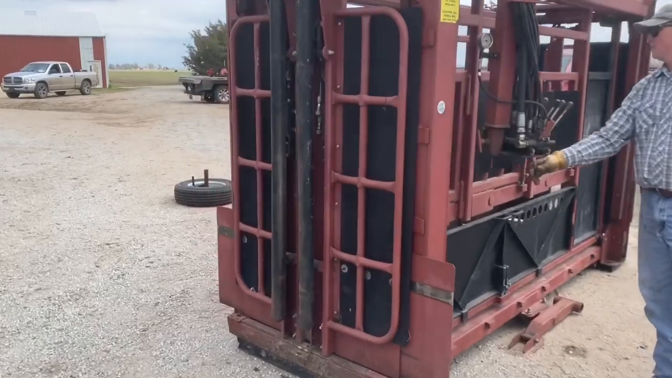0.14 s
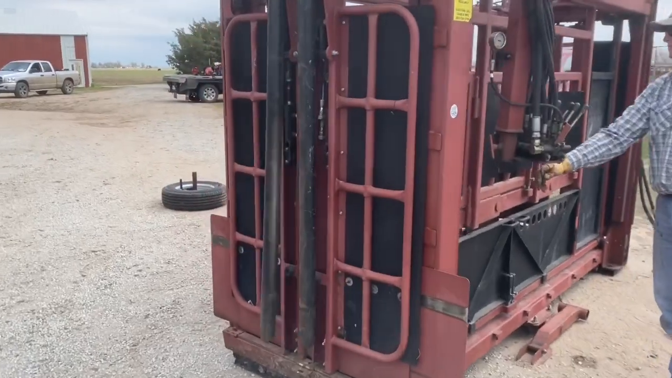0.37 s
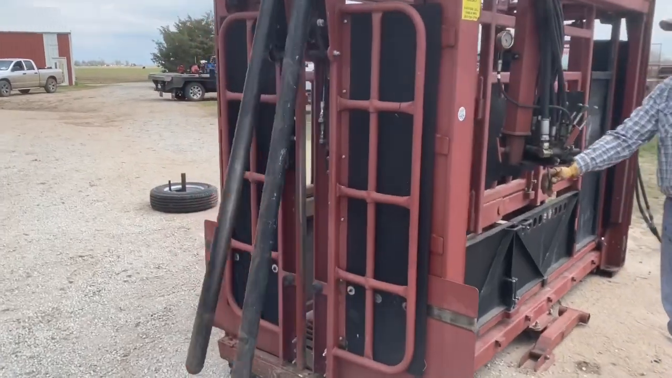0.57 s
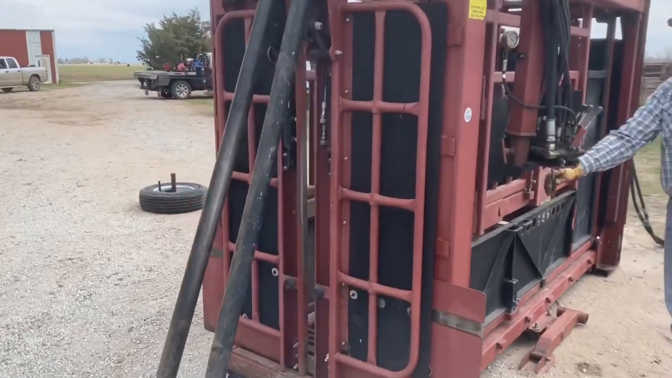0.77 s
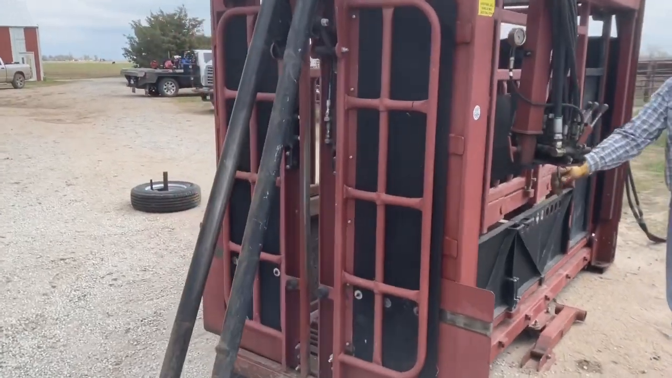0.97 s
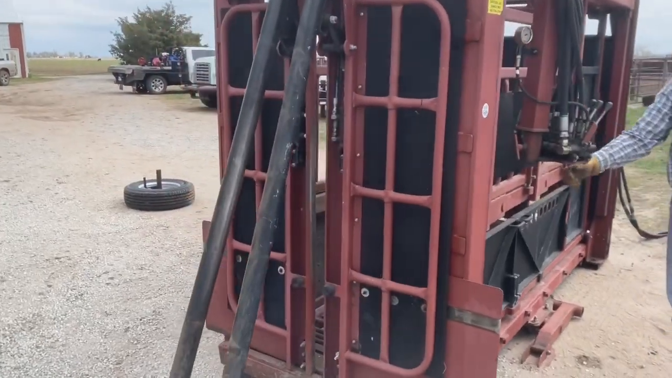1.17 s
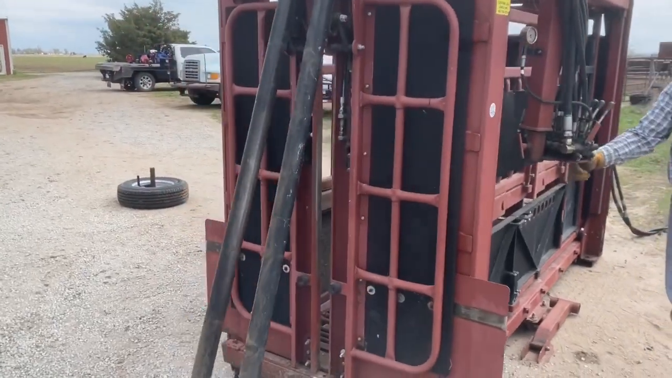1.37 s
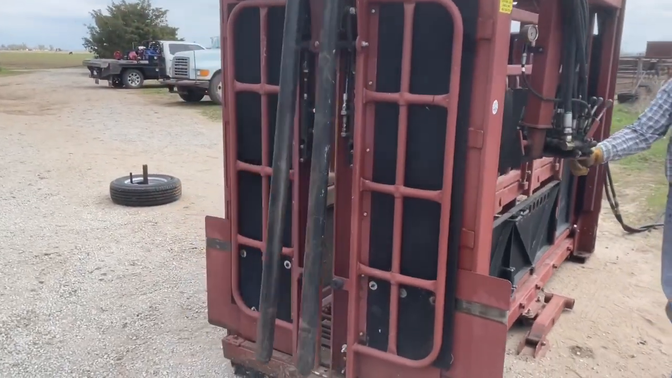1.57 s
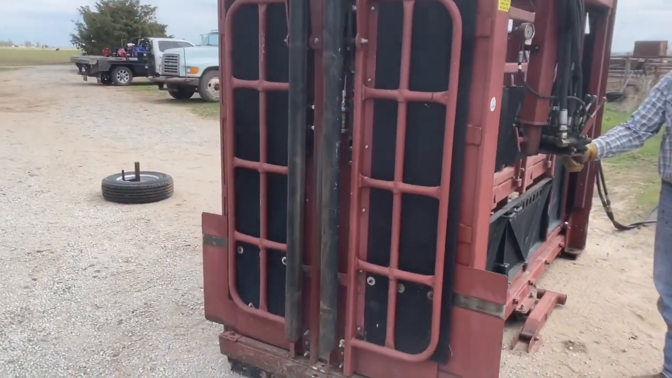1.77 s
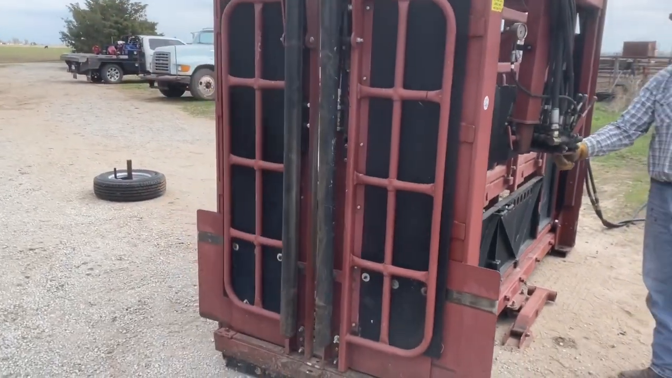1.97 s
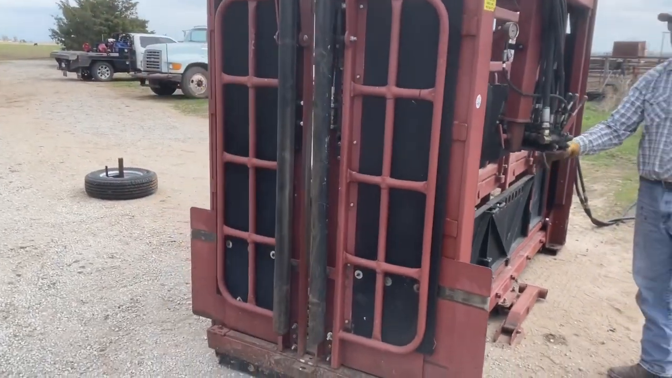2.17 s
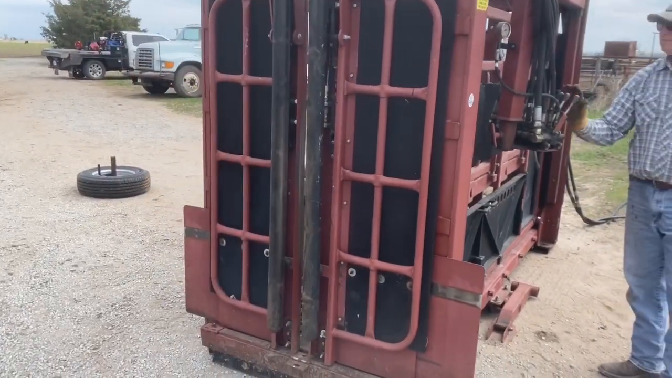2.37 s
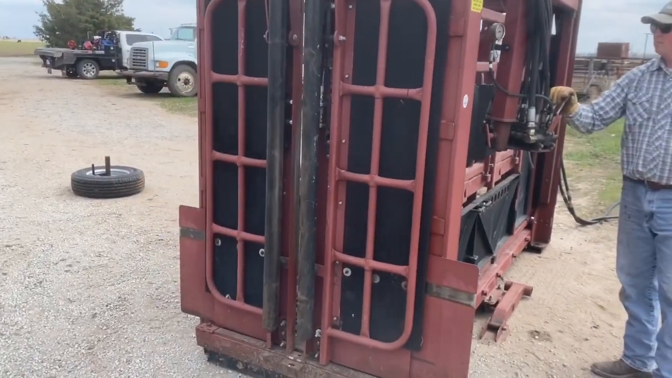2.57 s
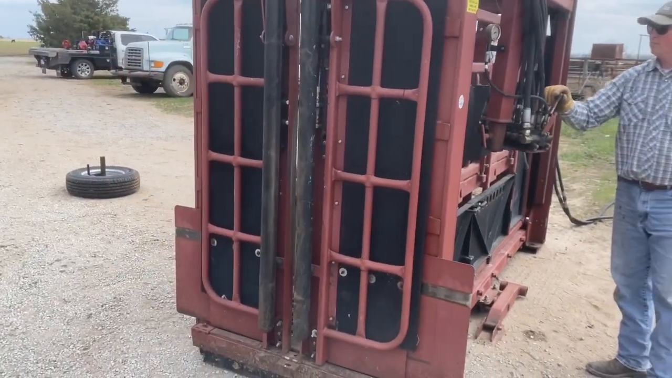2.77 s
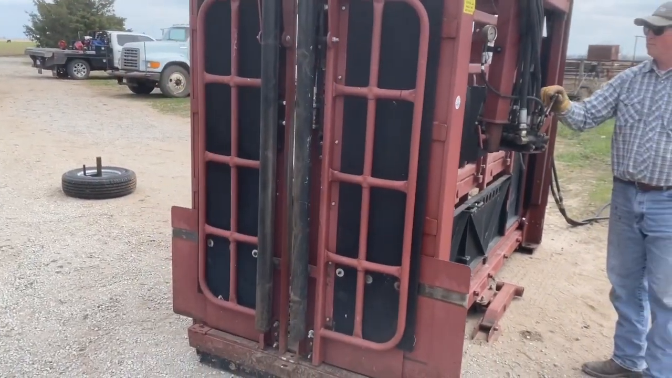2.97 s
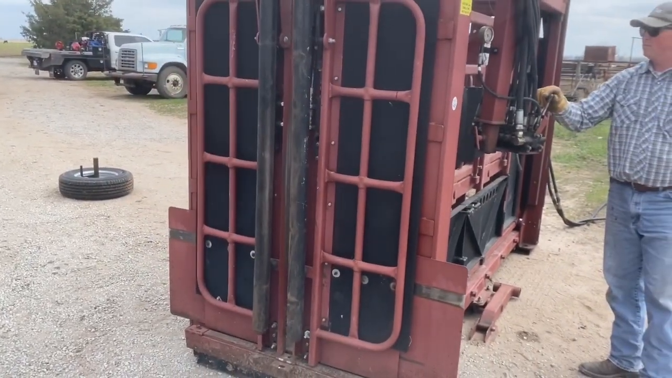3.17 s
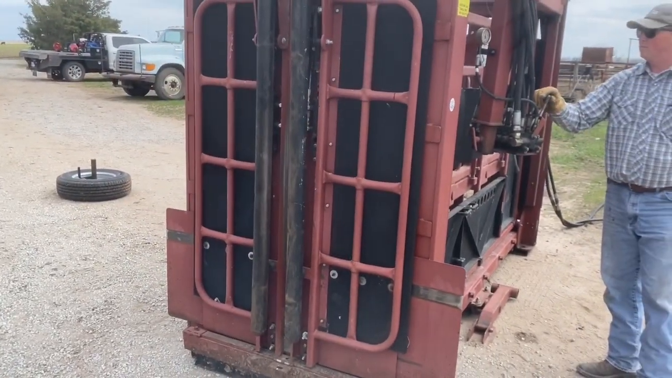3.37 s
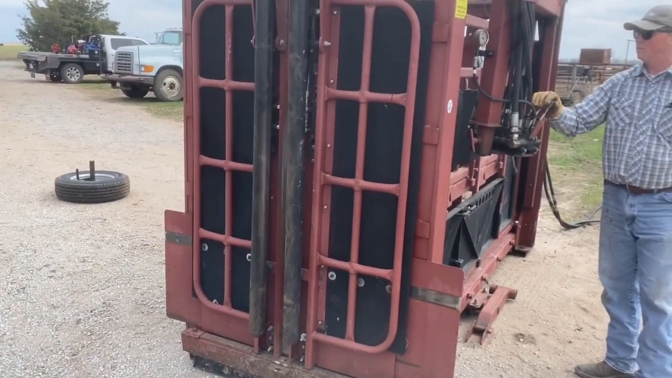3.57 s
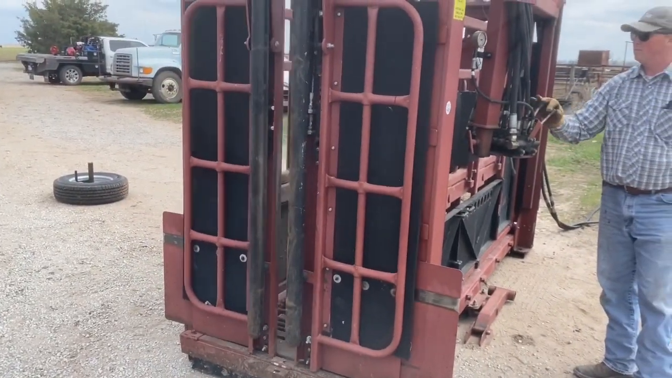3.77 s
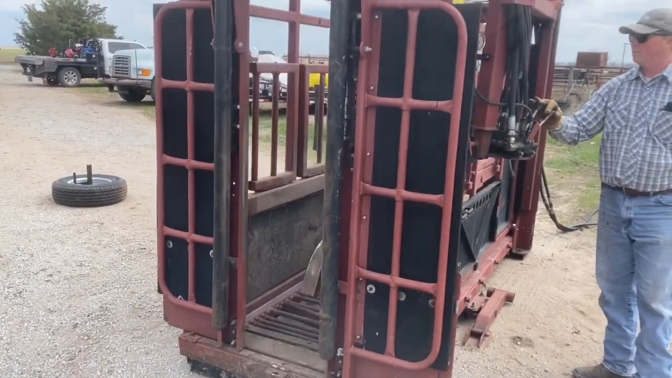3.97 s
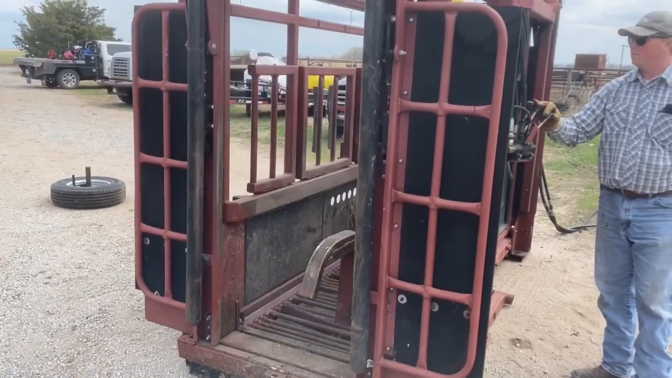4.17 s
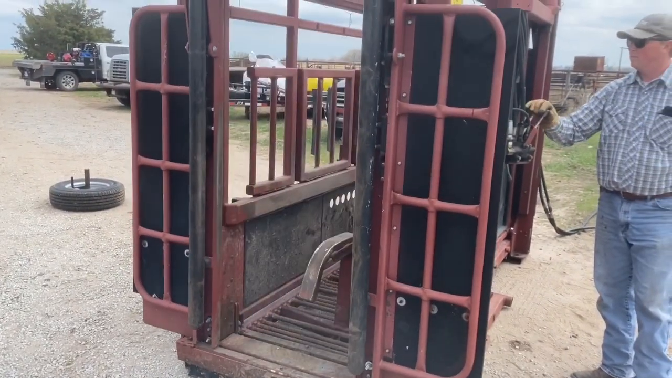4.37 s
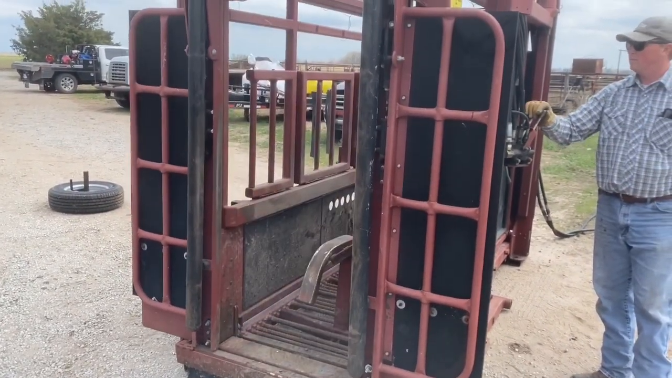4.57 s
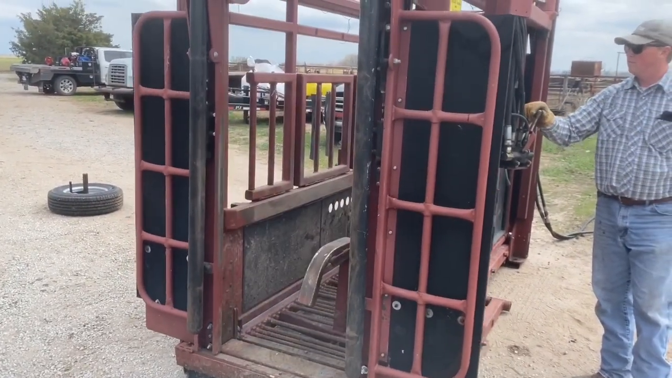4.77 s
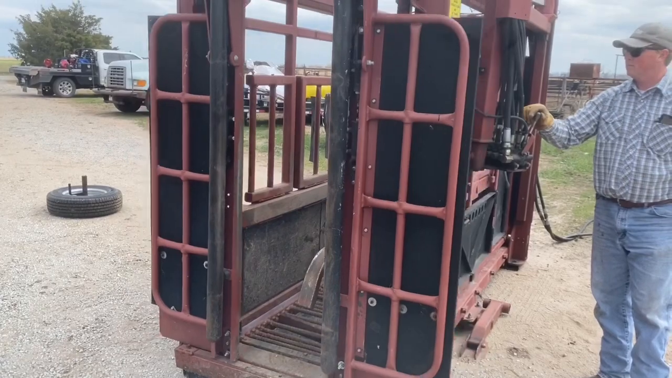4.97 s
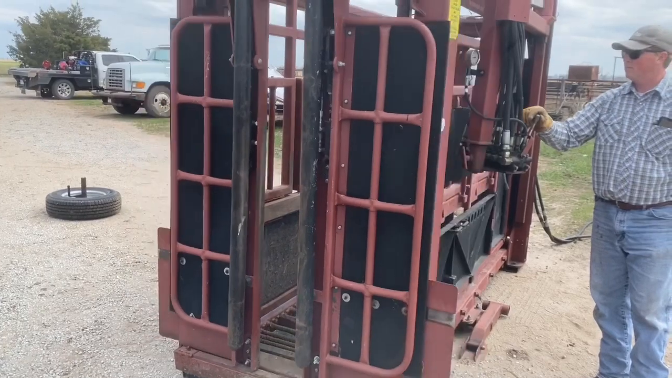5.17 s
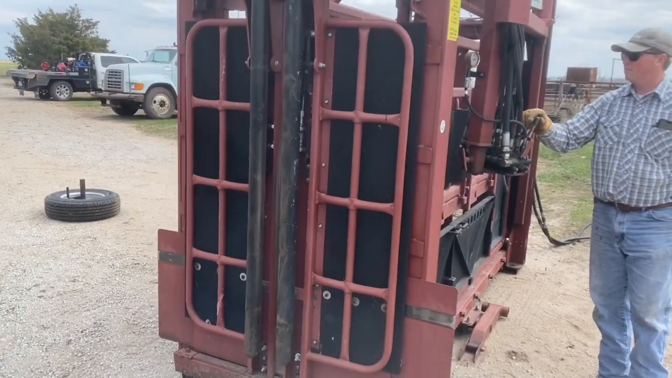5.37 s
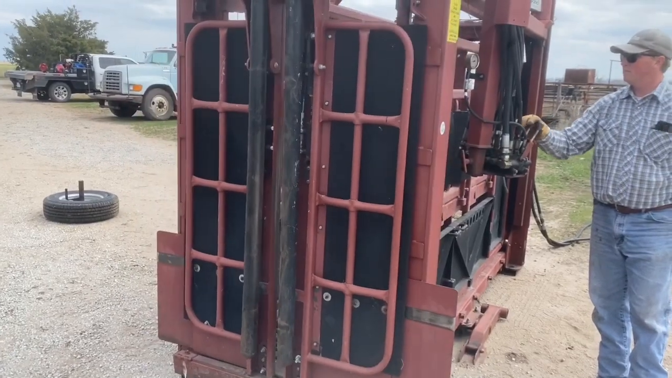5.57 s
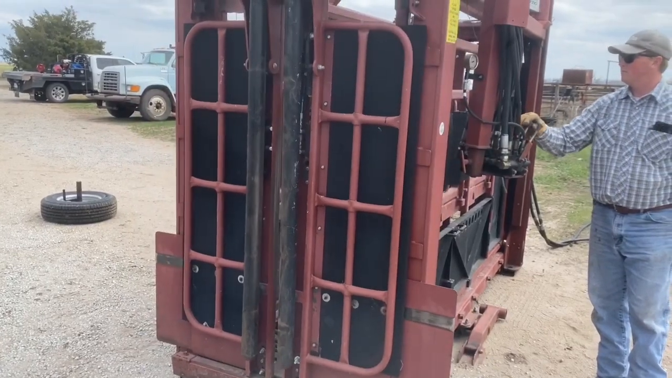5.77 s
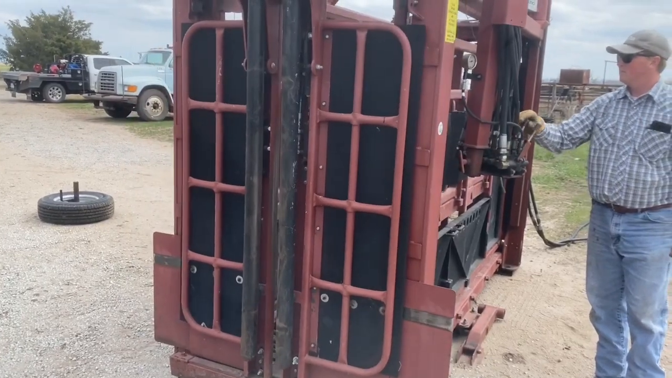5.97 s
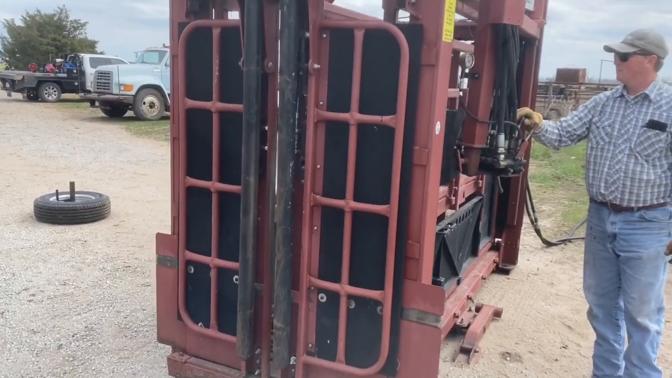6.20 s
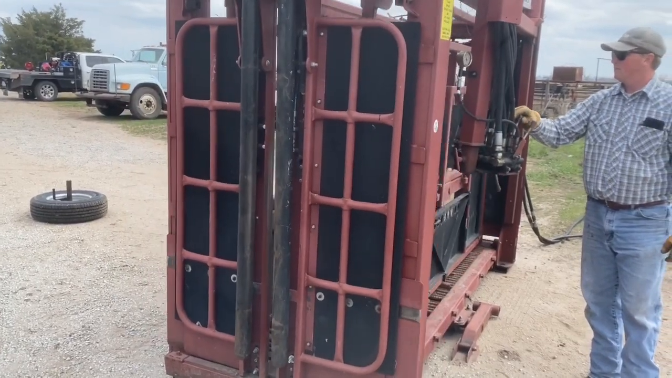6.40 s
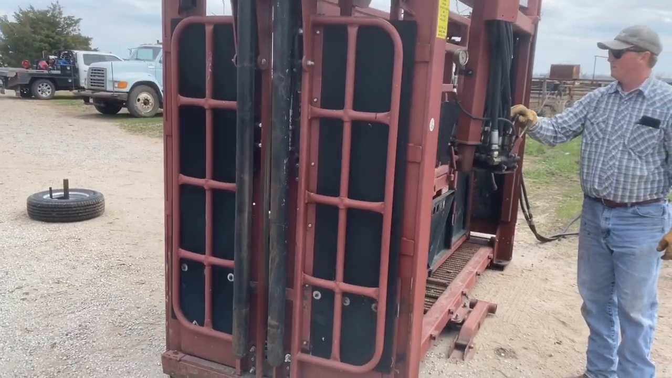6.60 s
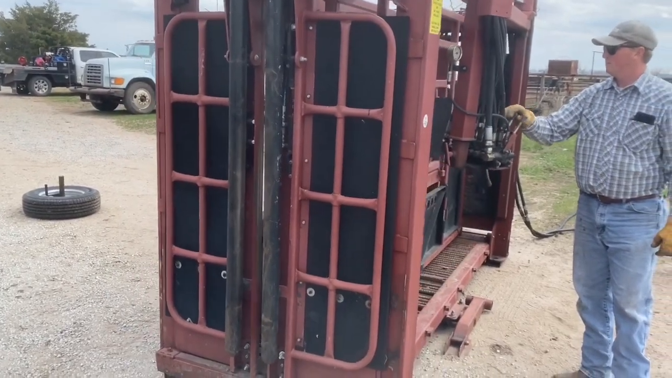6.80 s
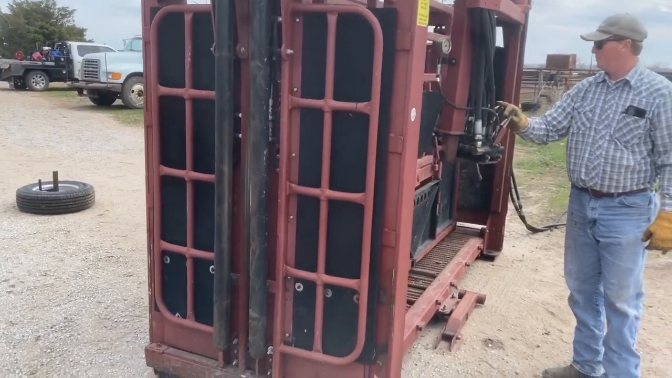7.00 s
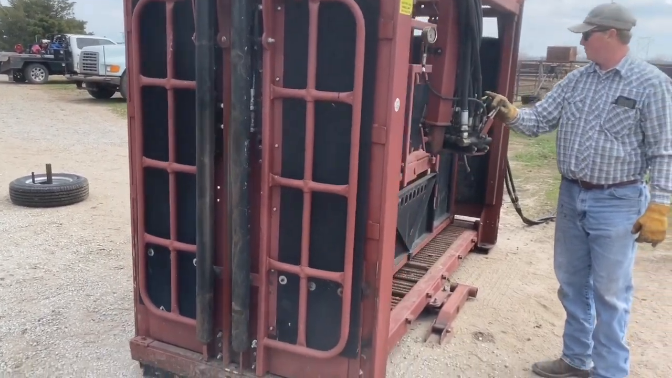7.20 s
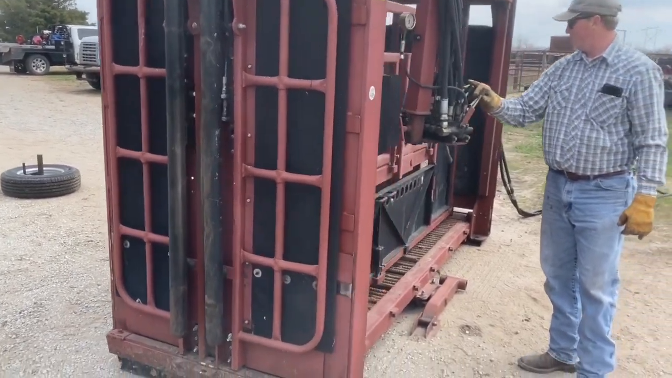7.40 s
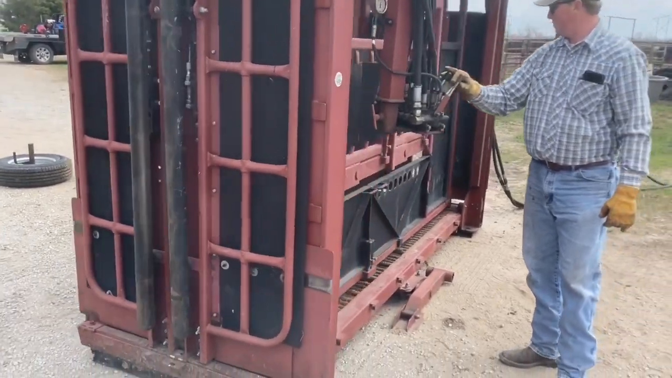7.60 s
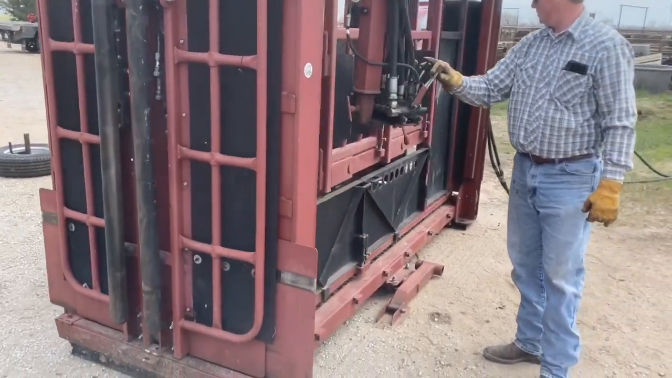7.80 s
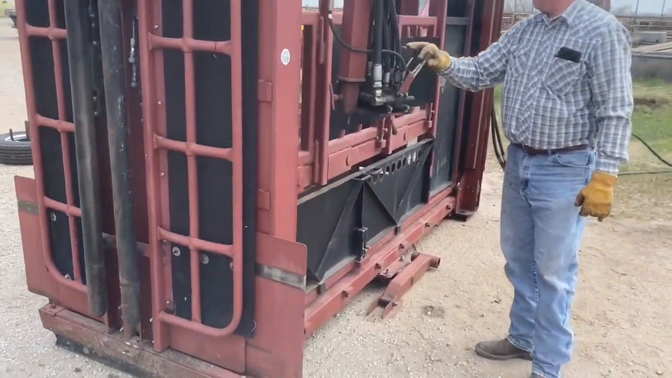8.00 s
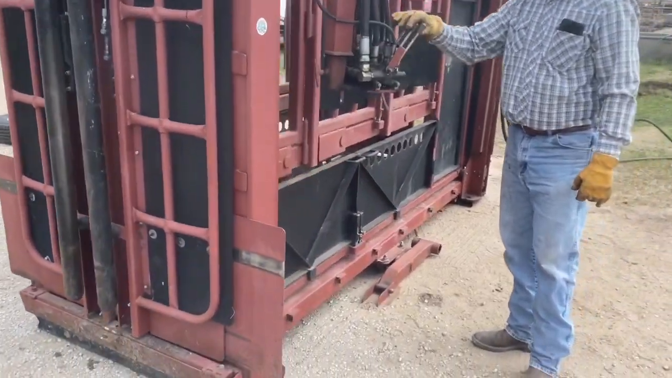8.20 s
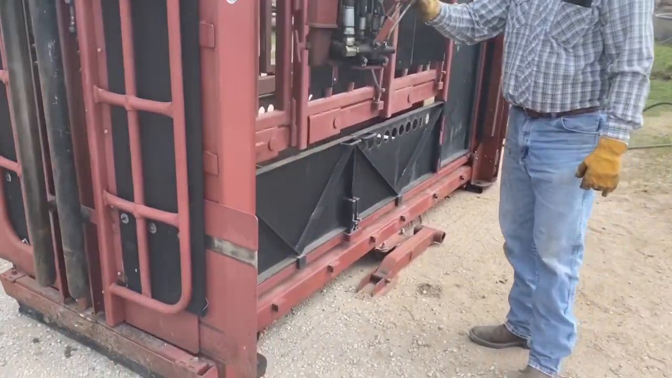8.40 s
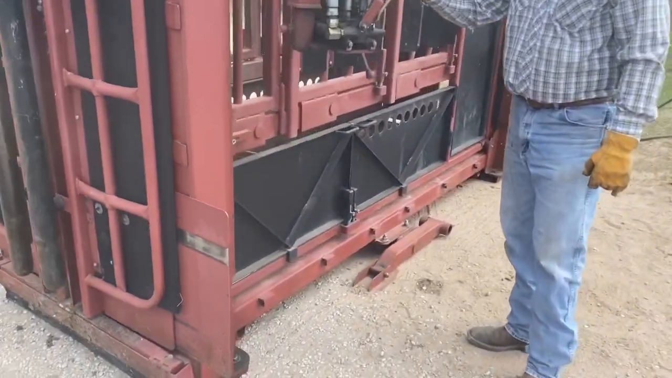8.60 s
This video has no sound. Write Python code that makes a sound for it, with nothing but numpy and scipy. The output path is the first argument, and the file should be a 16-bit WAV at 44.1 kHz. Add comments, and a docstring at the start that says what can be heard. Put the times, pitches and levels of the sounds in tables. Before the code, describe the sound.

Outdoors in a quiet yard, a hydraulic cattle chute is worked close to the microphone. Valve oil hisses over a faint pump hum; steel gates grind, squeal briefly and slam twice with deep booms. After a near-quiet pause they bang and rattle again, then slam. Finally the side panels scrape and clink lightly, with low wind rumble on the microphone.

```python
"""Steel head gates of an empty hydraulic cattle chute grind along a track, squeal and slam into their stops.
Friction and blows are bursts of noise played through modelled steel; later the side panels scrape and clink.
Oil hisses through the lever valves as shaped noise, and the pump motor hums throughout as a few wavering tones.
Quiet yard air is a bed of coloured noise; near the end, low bursts of noise make wind on the microphone."""
import sys
import numpy as np
from scipy import signal
from scipy.fft import rfft, irfft
from scipy.io import wavfile
from scipy.ndimage import uniform_filter1d

SR = 44100
rng = np.random.default_rng(int(sys.argv[2]) if len(sys.argv) > 2 else 0)


def wav_record(signal):
    """Record a signal, one row per channel, as 16-bit PCM in the file named by sys.argv[1]."""
    frames = np.transpose(np.atleast_2d(signal))
    bounded = np.clip(frames, -1, 1)
    # unit amplitude maps onto the largest positive 16-bit level
    quanta = np.round(bounded * 32767).astype(np.int16)
    wavfile.write(sys.argv[1], SR, quanta)


N = 381460
TIME = np.arange(N) / SR   # seconds

# Levels in the tables are starting levels; the functions then mix and shape them.
# long rings of the frame: pitch_hz, level_db, t60_s (time to fade by 60 dB)
FRAME_MODES = [(252, 0.5, 0.86), (358.6, -4, 0.55), (548, -20, 2), (590, -20, 1.86), (657, -17, 1.2),
               (690, -21, 2.1), (780, -10, 0.6), (923, -9, 0.45), (1140, -5.5, 0.43), (1233, 1, 0.26),
               (1520, -3, 0.32), (1840, -11, .48), (1940, -39, 1.8), (2630, -20, 0.49), (3100, -29, 0.38),
               (3600, -20, .4), (3890, -22, 0.27), (4580, -30, .7), (4664, -22, 0.69), (5400, -19, 0.18),
               (5670, -28, .22), (6200, -23.5, .25)]
# tone colour of the latch: frequency_hz, level_db
LATCH_COLOUR = [(150, -23), (350, -3), (1240, 2.5), (1940, -0.5), (2900, -9), (5000, -12.5), (7500, -23),
                (10000, -26.5), (15500, -39)]
# stereo width of the steel: frequency_hz, side_minus_mid_db
STEEL_WIDTH = [(60, -38.5), (350, -23), (700, -15.5), (1300, -10.5), (2400, -5.5), (4400, 2.5),
               (6500, -4.5), (9000, -11)]
# stereo width of the oil hiss and yard air: frequency_hz, side_minus_mid_db
OIL_WIDTH = [(60, -6), (300, -12), (1300, -1.5), (2400, -5.5), (4400, -2), (6500, -1), (9000, -14)]
# hum of the pump motor: pitch_hz, level_db
HUM = [(120, -49.5), (240, -64), (358, -61.5), (592, -71)]
# a lever is pulled and oil runs through its valve: opens_s, closes_s, hiss_db, whistle_hz
PULLS = [(-.1, 0.031, -47, 9830), (0.21, 0.224, -60, 9530), (0.275, 0.943, -47, 9470),
         (1.24, 1.257, -62, 9500), (1.327, 1.74, -47, 9400), (1.74, 1.86, -55, 9400),
         (1.87, 2.062, -47.5, 9470), (2.971, 3.09, -51, 8850), (3.087, 3.486, -48.5, 8750),
         (3.632, 3.66, -61, 9000), (3.72, 4.1, -61, 9260), (4.107, 4.282, -48.5, 9200),
         (4.63, 4.653, -59, 9170), (4.823, 5.36, -58, 9500), (6.028, 6.602, -57, 9330),
         (6.946, 7.03, -56, 9250), (7.044, 8.01, -47, 9340)]

# loose parts rattle while steel moves: knocks per second, level over that of the motion (dB)
GATE_RATTLES_PER_S, GATE_RATTLE_DB = 8, 2
PANEL_RATTLES_PER_S, PANEL_RATTLE_DB = 13, -10
RATTLE_CRACK_DB = -3.5   # relative to the clang of the same rattle


def amp(db):
    """Turn decibels into a plain multiplier."""
    return 10 ** (np.asarray(db) / 20)


def rms_one(x):
    """Scale a signal to an rms level of 1."""
    return x / np.sqrt(np.mean(x ** 2) + 1e-20)


def level(rows, axis=1):
    """Gain over time from a dB column; practically silent outside the table."""
    rows = np.array(rows)
    return amp(np.interp(TIME, rows[:, 0], rows[:, axis], left=-120, right=-120))


def at_hz(points, hz):
    """Read a table on a log-frequency axis."""
    points = np.array(points)
    return np.interp(np.log(hz + 1), np.log(points[:, 0]), points[:, 1])


def drift(rate):
    """Random wandering with rms 1, joining a given number of random points per second."""
    knots = rng.standard_normal(int(N / SR * rate) + 2)
    return rms_one(np.interp(TIME * rate, np.arange(len(knots)), knots))


def cut(x, hz, kind, order=2):
    """Butterworth filter: keeps the low, high or band part of a signal."""
    edges = np.clip(hz, 10, .45 * SR)
    return signal.sosfilt(signal.butter(order, edges, kind, fs=SR, output="sos"), x)


def stereo_noise(colour, width, lo_hz, hi_hz, size=N):
    """Coloured noise in two channels whose middle has rms 1 between lo and hi."""
    hz = np.fft.rfftfreq(size, 1 / SR)
    mid, side = rfft(rng.standard_normal((2, size))) * amp(at_hz(colour, hz))
    side = side * amp(at_hz(width, hz))
    unit = np.std(irfft(mid * (hz > lo_hz) * (hz < hi_hz), size))
    return irfft([mid + side, mid - side], size) / unit


def narrow_noise(hz, width_hz):
    """Stereo noise in a narrow band whose centre may move; rms 1."""
    slow = cut(rng.standard_normal((2, 3, N)), width_hz / 2, "low")
    turn = 2 * np.pi * np.cumsum(hz + np.zeros(N)) / SR
    shared, left, right = slow[0] * np.cos(turn) + slow[1] * np.sin(turn)
    return rms_one(shared + 0.13 * np.array([left, right]))


def pan(x, balance):
    """Lean each frequency to its side."""
    lean = at_hz(balance, np.fft.rfftfreq(N, 1 / SR)) / 2
    return irfft(rfft(x) * amp([lean, -lean]), N)


def steel(colour, width, lo_hz, hi_hz, t60, tail_db, tail_t60):
    """Response of welded steel to one tap: crowded modes that die fast, lows later, and a faint long ring."""
    t = TIME[:SR]
    rest, out = rfft(stereo_noise(colour, width, lo_hz, hi_hz, size=SR)), 0
    hz = np.fft.rfftfreq(SR, 1 / SR)
    octave = np.clip(np.round(np.log2((hz + 1) / 1000)), -3, 3)
    for k in np.unique(octave):
        slower = 2 ** (-.25 * k)   # both decay times hold near 1 kHz
        body = amp(-60 * t / (t60 * slower))
        tail = amp(tail_db - 60 * t / (tail_t60 * slower))
        fade = body + tail
        out = out + irfft(rest * (octave == k), SR) * fade / np.linalg.norm(fade)
    modes = rfft(out)

    def smooth_power(spectrum):
        return uniform_filter1d(np.mean(np.abs(spectrum) ** 2, axis=0), size=110)
    # even out lumps in the spectrum, then taper the end to silence
    evened = modes * np.sqrt(np.abs(smooth_power(rest) / smooth_power(modes)) / SR)
    return irfft(evened, SR) * np.minimum(2 * (1 - t), 1) ** 2


def sound(force, response):
    """A force played through a body."""
    return signal.fftconvolve(np.atleast_2d(force), response, axes=1)[:, :N]


def grains(per_s, spread_db):
    """Random tiny contacts of uneven size; rms 1."""
    sizes = amp(spread_db * np.minimum(rng.exponential(1, N), 4)) * rng.choice([-1, 1], N)
    return rms_one(sizes * (rng.random(N) < per_s / SR))


def contacts(times, dbs, decays, rise_s):
    """Force of blows between loose parts: each is a quickly dying burst of chatter."""
    power = np.zeros(N)
    for s, db, decay in zip(times, dbs, decays):
        start = max(int((s - rise_s) * SR), 0)
        t = TIME[:min(SR // 4, N - start)]
        burst = amp(db) * np.minimum(t / rise_s, 1) * np.exp(-t / max(decay, .001))
        power[start:start + len(t)] += burst ** 2
    return np.sqrt(power) * grains(per_s=6000, spread_db=2.0)


def wander(force, depth_db, size=256):
    """A sliding contact keeps moving, so it feeds other modes from moment to moment."""
    spectra = signal.stft(force, nperseg=size)[2]
    patches = rng.standard_normal(spectra.shape)
    for _ in range(2):
        patches = uniform_filter1d(patches, size=2, axis=0)    # across frequency
        patches = uniform_filter1d(patches, size=11, axis=1)   # across time
    gain = rms_one(amp(depth_db * rms_one(patches)))
    return signal.istft(spectra * gain, nperseg=size)[1][:N]


def stroke(start, stop, db, rise_s, fade_db_per_s, swell_db=0):
    """Gain of one movement: it gets under way, holds or changes steadily, and dies away after the stop."""
    along = np.clip((TIME - start) / (stop - start), 0, 1)
    fade_db = fade_db_per_s * np.maximum(TIME - stop, 0)
    return np.clip((TIME - start) / rise_s, 0, 1) * amp(db + swell_db * along - fade_db)


def rattles(motion, per_s, over_db):
    """Loose parts knock at uneven intervals, as hard as the motion is strong: rows (s, dB)."""
    chance = rng.random((int(N / SR * per_s), 2))
    s = (np.arange(len(chance)) + chance[:, 0]) / per_s
    scatter_db = 4 * (2 * chance[:, 1] - 1)
    db = 20 * np.log10(np.interp(s, TIME, motion) + 1e-9) + over_db + scatter_db
    return zip(s, db)


def frame_ring(force, table=FRAME_MODES):
    """Long modes of struck steel, as decaying tones heard a little differently on each side."""
    t = TIME[:2 * SR]
    modes = 0
    for hz, db, t60 in table:
        phase = rng.normal(0, 0.6, (2, 1))
        modes = modes + amp(db - 60 * t / t60) * np.sin(2 * np.pi * hz * t + phase)
    return sound(force, modes / np.linalg.norm(modes[0]))


def pump():
    """The motor hum swells under load; its upper lines waver more than the lowest."""
    # faint whine of the pump: pitch_hz, level_db
    whine_lines = [(657, -71.5), (1943, -71), (4635, -80)]
    # the hum grows while a cylinder pushes against its stop: time_s, gain_db
    load_curve = [(0, 4.5), (.2, -0.5), (.3, 1), (1.2, -2), (1.45, 3.5), (2.12, 4.5), (2.25, -0.5),
                  (3.12, -.5), (3.2, 2.5), (3.58, -1), (3.66, -0.5), (8.65, -3)]
    lowest = HUM[0][0]
    hum = 0
    for hz, db in HUM:
        gain = amp(db + 0.87 * np.sqrt(hz / lowest) * drift(6.3)) * np.sqrt(2)
        hum = hum + gain * np.sin(2 * np.pi * hz * TIME + 0.15 * hz / lowest * drift(9))
    whine = 0
    for hz, db in whine_lines:
        gain = amp(db + 2.5 * drift(13)) * np.sqrt(2)
        whine = whine + gain * np.sin(2 * np.pi * hz * TIME + 1.3 * drift(45))
    return amp(np.interp(TIME, *np.transpose(load_curve))) * hum + whine


def oil_flow():
    """Gain of the oil hiss: one stroke for each pull of a lever, over a steady leak."""
    leak = amp(-76)
    pulls = sum(stroke(opens, closes, db, rise_s=0.026, fade_db_per_s=335) for opens, closes, db, _ in PULLS)
    return leak + pulls


def valves():
    """Oil jets hiss, ring the valve ports and whistle breathily, pulsing slightly with the pump."""
    # tone colour of the oil: frequency_hz, level_db
    oil_colour = [(250, -12), (500, -12), (900, 1), (1750, -1), (2450, -3), (3300, -6.5), (4000, -7),
                  (4700, -4.5), (5600, -13), (7400, -7), (8400, 1.5), (9900, -0.5), (10900, 1.5),
                  (13000, -5), (16000, -9)]
    # the jet sings in the ports: pitch_hz, width_hz, level_db relative to the hiss
    port_modes = [(1700, 130, -16.5), (2300, 90, -17), (2480, 54, -14), (11040, 660, -22),
                  (15400, 800, -13.5)]
    ripple = 1 + 0.066 * np.sin(2 * np.pi * HUM[0][0] * TIME)
    noise = stereo_noise(oil_colour, OIL_WIDTH, 9200, 16400)
    hiss = np.array([wander(side, depth_db=2.5, size=1024) for side in noise])
    ports = sum(amp(db + 1.5 * drift(9)) * narrow_noise(hz, width) for hz, width, db in port_modes)
    # the whistle glides from one pull's pitch to the next
    s, hz = np.transpose(sorted((s, hz) for opens, closes, _, hz in PULLS for s in (opens, closes)))
    whistle_hz = np.interp(TIME, s, hz) + 90 * drift(8)
    whistle = amp(-7.5) * narrow_noise(whistle_hz, width_hz=520)
    return oil_flow() * ripple * amp(1.2 * drift(40)) * (hiss + ports + whistle)


def gate_motion():
    """Gains of grinding and judder; the gates go on shaking after they have stopped sliding."""
    # the head gates slide: start_s, stop_s, grinding_db, judder_db, swell_db (change over the stroke)
    gate_strokes = [(-.1, 0.144, -49.5, -63, 1.5), (0.426, 0.792, -41.5, -41, 11),
                    (1.288, 1.648, -39, -35, -25), (1.714, 1.97, -38.5, -29, -6), (3.692, 4.2, -30, -28, 3),
                    (4.708, 5.403, -38, -34, 6.5)]
    rise_s = 0.022
    grinding, judder = 0, 0
    for start, stop, grind_db, judder_db, swell in gate_strokes:
        grinding = grinding + stroke(start, stop, grind_db, rise_s, 90, swell)
        judder = judder + stroke(start, stop, judder_db, rise_s, 43.5, swell)
    return grinding, judder


def gate_travel():
    """The gates slide along the track: fine friction, coarse catches that ring steel, judder on the hangers."""
    # tone colour of the track: frequency_hz, level_db
    track_colour = [(30, -40), (55, -4.5), (130, -5.5), (180, -2.5), (300, -4), (370, -4), (560, -9.5),
                    (850, -11), (1300, -10), (1900, -15.5), (2900, -22), (5400, -28.5), (9000, -40),
                    (15000, -77.5)]
    catches = wander(grains(per_s=500, spread_db=2.0), depth_db=3.0)
    track = steel(track_colour, STEEL_WIDTH, 380, 2500, t60=0.031, tail_db=-18.5, tail_t60=0.43)
    coarse = sound(catches, track)
    fine = stereo_noise(track_colour, STEEL_WIDTH, 370, 2300)
    grinding, shaking = gate_motion()
    grind = grinding * amp(1.8 * drift(45)) * (.55 * fine + .83 * coarse)
    shake = shaking * grains(per_s=500, spread_db=1)
    hangers = steel(track_colour, STEEL_WIDTH, 140, 460, t60=0.029, tail_db=-27.5, tail_t60=0.49)
    judder = sound(shake, hangers)
    out = amp(-1.0) * cut(grind, 363, "high")
    out = out + amp(-1.34) * cut(judder, [70, 600], "band")
    return out + amp(-11.0) * frame_ring(shake)


def ticks():
    """Small dry ticks: pairs of tones that die within a few milliseconds."""
    # start_s, pitch_hz, level_db
    tick_table = [(.114, 2400, -35), (.158, 1220, -25), (1.096, 2440, -32), (1.43, 2300, -31.5),
                  (2.445, 3300, -47)]
    out = np.zeros(N)
    for s, hz, db in tick_table:
        t = np.clip(TIME - s, 0, .1)
        tones = np.sin(2 * np.pi * hz * t) + .5 * np.sin(2 * np.pi * 1.47 * hz * t)
        out += amp(db) * np.exp(-t / 0.00091) * tones
    return out


def gate_blows():
    """Gates hit their stops and rattle: panels thud, tubes clang, contacts crack and wake the high rings."""
    # hits and rebounds: time_s, clang_db, thud_db and crack_db relative to the clang, chatter_decay_s
    blow_table = [(.265, -33.5, 2.5, -21, 0.0098), (.433, -24, -5.5, -13.5, 0.018),
                  (.494, -25, -5, -24, 0.0089), (.665, -7.5, -28, -14.5, 0.0068),
                  (.695, -16, -16, -11, 0.02), (.731, -19, -12, -3, 0.0075), (.776, -21.5, -17, -2, 0.0059),
                  (.805, -7, -9, -9.5, 0.01), (.857, -16, 0, -15, .015), (.986, -24.5, -5.5, -18.5, 0.015),
                  (1.259, -34, -3, -25, 0.025), (1.667, -14.5, 1.5, -1.5, 0.014),
                  (1.685, -16, -3, -11, .012), (1.695, -6, -4, -9, 0.014), (1.728, -9, -13, -8, 0.013),
                  (1.777, -19, -0.5, -11, 0.019), (1.95, -38, 7.5, -24, 0.047),
                  (2.096, -48, -10, -3.5, 0.041), (2.15, -42.5, -5, -6.5, 0.011),
                  (2.314, -55, 9, -24, .015), (3.662, -43, 4.5, -13, 0.02), (3.709, -18, -4, -5.5, 0.01),
                  (3.724, -23, 9.5, -23, .012), (3.784, -18.5, -9, -22, 0.0066),
                  (3.889, -17.5, 2.5, -18, 0.013), (3.955, -24.5, 0.5, -8.5, 0.016),
                  (3.997, -25, -3, -20, 0.0071), (4.116, -16, -16, -7, 0.034),
                  (4.139, -7.5, -6, -11.5, 0.013), (4.193, -15.5, -2, -13.5, 0.014),
                  (4.218, -26, 4, -20, 0.015), (4.262, -17, -8, -19.5, 0.011),
                  (4.339, -31, -4, -12, 0.0069), (4.395, -39.5, -6, 0.5, 0.012),
                  (4.731, -22, 5.5, -24, 0.0059), (4.768, -36, 15, -25, 0.0083),
                  (4.954, -24.5, -11, -14, 0.0089), (5.154, -26, -5, -19, .008),
                  (5.258, -26.5, 0, -2, 0.018), (5.316, -21.5, -8, -13, 0.048),
                  (5.34, -9, -7.5, -9.5, 0.022), (5.387, -15.5, 0, -2, 0.015), (5.432, -20, -3, -18, 0.016),
                  (5.539, -31.5, 2.5, -13.5, 0.029), (5.635, -44, -6, -6, .006),
                  (5.775, -44, 0, -9, 0.0051), (5.911, -43, -14, -13, .007)]
    # tone colour of the frame: frequency_hz, level_db
    frame_colour = [(25, -49), (40, 3), (70, -0.5), (250, 1.5), (310, -3.5), (370, -1), (600, -3),
                    (850, -5), (1800, -10.5), (2900, -24), (6300, -30.5), (8400, -41), (10000, -45),
                    (15500, -76)]
    loose = []
    for s, db in rattles(gate_motion()[0], GATE_RATTLES_PER_S, GATE_RATTLE_DB):
        loose.append((s, db, -19, RATTLE_CRACK_DB, 0.0097))
    s, clang_db, thud_db, crack_db, decay = np.transpose(list(blow_table) + loose)
    force = contacts(s, clang_db, decay, rise_s=0.0027)
    hard = contacts(s, clang_db + crack_db, decay, rise_s=0.0037)
    heavy = contacts(s, clang_db + thud_db, decay, rise_s=0.0027)
    panels = steel(frame_colour, STEEL_WIDTH, 60, 293, t60=0.097, tail_db=-19.0, tail_t60=0.57)
    tubes = steel(frame_colour, STEEL_WIDTH, 480, 2500, t60=0.05, tail_db=-27.5, tail_t60=0.46)
    edges = steel(frame_colour, STEEL_WIDTH, 2440, 9000, t60=0.052, tail_db=-18.0, tail_t60=0.36)
    thud = cut(sound(heavy, panels), [170, 560], "band", order=3)
    clang = cut(sound(force, tubes), [420, 2500], "band")
    crack = cut(sound(hard, edges), 2740, "high")
    low_push = amp(-8.5) * cut(force, 1970, "low", order=4)
    high_push = amp(3.0) * cut(hard, 2300, "high", order=4)
    ring = frame_ring(low_push + high_push)
    return amp(1.85) * thud + amp(2.0) * clang + amp(2.5) * crack + ring


def squeal(track):
    """Dry steel on steel sings, then breaks up into a rough chirp as it slows and falls in pitch."""
    s, hz, _ = np.transpose(track)
    inertia_s = 0.012   # smooths the pitch
    pitch = uniform_filter1d(np.interp(TIME, s, hz), size=int(inertia_s * SR))
    slowing = 1 - pitch / hz.max()
    rough_pitch = pitch * (1 + (.015 + .3 * slowing) * drift(1400))
    phase = 2 * np.pi * np.cumsum(rough_pitch) / SR
    overtone = amp(-14 - 25 * slowing + 4 * drift(60)) * np.sin(2 * phase)
    roughness = amp(2.5 + (2 + 6 * slowing) * drift(400))
    tone = level(track, axis=2) * roughness * (np.sin(phase) + overtone)
    body = steel(LATCH_COLOUR, STEEL_WIDTH, 1500, 3000, t60=.04, tail_db=-30, tail_t60=.3)
    return tone + amp(-21) * sound(tone, body)


def loose_rings():
    """After a knock, loose levers, springs or pins ring on as single tones, fluttering in their seats."""
    # start_s, pitch_hz, level_db, t60_s
    ring_table = [(0.666, 1250, -17, .16), (.807, 1143, -26, .16), (.86, 741, -33, .5),
                  (.99, 600, -31.5, 0.19), (1.282, 612, -33.5, 0.17), (1.697, 345, -20, 0.23),
                  (1.728, 1230, -20, .18), (1.945, 244, -30, 0.38), (2.1, 590, -43, 1.4),
                  (2.153, 668, -49.5, 1.65), (4.139, 521, -16, 0.14), (4.14, 6340, -29, 0.18),
                  (4.212, 364, -10, 0.18), (5.345, 1202, -15, 0.22), (5.35, 6290, -29, 0.29),
                  (5.387, 5402, -38, .4), (5.387, 5630, -37, 0.37), (6.455, 571, -25.5, 0.18),
                  (7.334, 576, -28, 0.18), (7.566, 585, -42, 0.19), (8.117, 1462, -47, 1.8)]
    out = np.zeros(N)
    wobble = 1 + 0.0037 * drift(140)   # share of the pitch
    flutter = amp(2 * drift(60))
    for s, hz, db, t60 in ring_table:
        span = slice(int(s * SR), int(s * SR) + SR)
        t = TIME[span] - TIME[span][0]
        tone = np.sin(2 * np.pi * hz * np.cumsum(wobble[span]) / SR)
        out[span] += tone * np.minimum(t / .004, 1) * amp(db - 60 * t / t60)
    return out * flutter


def thumps():
    """Heavy slams rock the whole chute on its skids: a deep boom of a few fading low tones."""
    # start_s, level_db, pitch_hz
    thump_table = [(0.667, -25, 90), (0.808, -19, 74), (0.858, -20.5, 101), (1.688, -10.5, 72),
                   (1.722, -17, 136), (3.722, -25, 90), (5.349, -11.5, 137), (5.385, -17, 71)]
    # tones of the rocking: multiple_of_pitch, level_db
    rock_modes = [(.68, -8), (1.001, 1), (1.43, -4.5)]
    rise_s, t60_s = 0.0034, 0.21
    t, out = TIME[:SR], np.zeros(N + SR)
    for s, db, hz in thump_table:
        rock = sum(amp(mode_db) * np.sin(2 * np.pi * hz * ratio * t) for ratio, mode_db in rock_modes)
        out[int(s * SR):][:SR] += rock * np.minimum(t / rise_s, 1) * amp(db - 60 * t / t60_s)
    return cut(out[:N], 50, "high", order=3)


def struck_bars(times, dbs, pitches):
    """Each clink briefly rings a loose bar of its own pitch."""
    # tones of a struck bar: multiple_of_pitch, level_db
    bar_partials = [(.37, -12), (.77, -8), (1.001, -1.5), (1.06, -6.5), (1.24, -7.5)]
    t60_s, bar_db = 0.11, -8.5
    t, out = TIME[:SR // 3], np.zeros((2, N + SR))
    for s, db, hz in zip(times, dbs, pitches):
        ring = 0
        for ratio, part_db in bar_partials:
            gain = amp(part_db + rng.normal(0, 2.9))
            ring = ring + gain * np.sin(2 * np.pi * hz * ratio * t + rng.normal(0, 0.34, (2, 1)))
        start = int(s * SR)
        fade = amp(db + bar_db - 60 * t / t60_s)
        out[:, start:start + len(t)] += ring * fade * np.minimum(t / 0.0015, 1)
    return out[:, :N]


def side_panels():
    """The squeeze panels scrape on their pivots; loose bars and the latch clink."""
    # the panels move: start_s, stop_s, scraping_db, swell_db (change over the stroke)
    panel_strokes = [(6.04, 6.704, -32.5, -5), (7.007, 7.992, -40.5, -1.5), (8.053, 8.432, -48.5, -5.5)]
    # panels and latch knock, each time on another bar: time_s, clang_db, crack_db relative to it, pitch_hz
    clink_table = [(6.065, -31.5, -28, 1220), (6.147, -20, -21, 2050), (6.311, -22.5, -10, 1880),
                   (6.398, -25, -6.5, 1850), (6.444, -17.5, -15.5, 2290), (6.493, -22.5, -9, 2040),
                   (6.582, -23, -5.5, 1840), (6.631, -26.5, -12, 1450), (6.776, -27, -6, 1940),
                   (6.982, -34, -32, 950), (7.103, -26, -12, 1260), (7.198, -27, -5.5, 1480),
                   (7.237, -18.5, -7, 1950), (7.295, -25, -9, 1840), (7.399, -26, -9, 1160),
                   (7.428, -24, -7, 1630), (7.493, -30, -5, 1960), (7.541, -27, -20, 1203),
                   (7.566, -31, -9, 1520), (7.74, -33, -3.5, 1700), (7.889, -22.5, -22, 1285),
                   (7.915, -22, -19, 1950), (7.955, -23, -22, 1930), (8.078, -22, -7, 2030),
                   (8.099, -27.5, -23, 966), (8.117, -18.5, -4.5, 1950), (8.21, -31.5, -10, 2020),
                   (8.309, -23, -6.5, 1950), (8.366, -37, -17, 1990), (8.405, -29, -14.5, 1340)]
    # tone colour of the panels: frequency_hz, level_db
    panel_colour = [(50, -8), (100, -4), (220, 5), (350, 1.5), (470, -5), (570, -0.5), (850, -6.5),
                    (1900, -8.5), (3300, -18.5), (5300, -20), (9000, -29), (15000, -34)]
    # stereo width of the panels: frequency_hz, side_minus_mid_db
    panel_width = [(60, -12), (300, -16), (700, -13.5), (1300, -9.5), (2400, -6), (4400, -3), (9000, -9)]
    # long rings of the panels' bars: pitch_hz, level_db, t60_s
    bar_modes = [(1463, -1, 0.52), (1775, 4, 0.29), (1950, -2, 0.24), (2400, -1, 0.14), (3980, -4, 0.17),
                 (4380, 0, 0.11)]

    catches = wander(grains(per_s=330, spread_db=2.0), depth_db=3.5, size=512)
    pivots = steel(panel_colour, panel_width, 620, 2200, t60=0.16, tail_db=-35.0, tail_t60=0.21)
    coarse = sound(catches, pivots)
    fine = stereo_noise(panel_colour, panel_width, 670, 2700)
    motion = sum(stroke(start, stop, db, 0.15, 114, swell) for start, stop, db, swell in panel_strokes)
    scrape = motion * amp(1.0 * drift(40)) * (.45 * fine + .8 * coarse)

    loose = []
    for s, db in rattles(motion, PANEL_RATTLES_PER_S, PANEL_RATTLE_DB):
        loose.append((s, db, RATTLE_CRACK_DB, rng.uniform(1250, 2400)))
    s, clang_db, crack_db, hz = np.transpose(list(clink_table) + loose)
    decay = np.full(len(s), 0.011)   # seconds of chatter
    knocks = contacts(s, clang_db, decay, rise_s=.001)
    latch = steel(LATCH_COLOUR, panel_width, 1000, 2500, t60=.045, tail_db=-22, tail_t60=.5)
    clang = cut(sound(knocks, latch), [450, 2800], "band")
    hard = contacts(s, clang_db + crack_db, decay, rise_s=0.0043)
    edges = steel(LATCH_COLOUR, panel_width, 2420, 9000, t60=0.096, tail_db=-28, tail_t60=0.25)
    crack = cut(sound(hard, edges), 2100, "high")

    # the longer, lower bars also shake the panel they hang in
    shake_db = clang_db - 8 + 23 * np.log2(1200 / hz)
    shaken = contacts(s, shake_db, 1.9 * decay, rise_s=0.001)
    panel = steel(panel_colour, panel_width, 400, 1400, t60=0.047, tail_db=-31, tail_t60=.35)
    body = cut(sound(shaken, panel), [380, 1400], "band")
    out = amp(0.36) * scrape + body + amp(-11.0) * clang + amp(0.5) * crack
    return out + amp(-13.0) * frame_ring(knocks, bar_modes) + struck_bars(s, clang_db, hz)


def rasps():
    """Where a panel catches, a run of tiny slips swells and fades in one region of its modes."""
    # start_s, length_s, level_db, centre_hz
    rasp_table = [(6.118, 0.094, -34, 1950), (6.142, 0.13, -32, 1000), (6.576, 0.13, -39, 1390),
                  (7.236, 0.12, -37, 1890), (7.396, 0.057, -35.5, 1400), (7.71, 0.058, -39.5, 950),
                  (7.895, 0.086, -35, 2000)]
    half_width = 2 ** (0.79 * np.array([-.5, .5]))   # band 0.79 octave wide
    out = np.zeros((2, N))
    slips, apart = grains(per_s=400, spread_db=0.5), grains(per_s=400, spread_db=6.0)
    for s, length, db, hz in rasp_table:
        span = slice(int(s * SR), int((s + length) * SR))
        sides = [slips[span] + 0.46 * apart[span], slips[span] - .4 * apart[span]]
        band = cut(sides, hz * half_width, "band")
        out[:, span] += amp(db) * rms_one(band) * np.sin(np.linspace(0, np.pi, band.shape[1]))
    return out


def wind():
    """Lumpy pressure on the microphone ports, partly shared; small eddies pass quickly and reach higher."""
    # single eddies hitting the ports: time_s, level_db, top_hz
    buffet_table = [(6.966, -27, 176), (7.04, -26.5, 148.5), (7.29, -27, 160), (7.556, -20.5, 170),
                    (7.6, -25.5, 190), (7.645, -25, 153), (7.755, -33, 198), (7.989, -24, 230),
                    (8.04, -25.5, 281), (8.095, -19, 189), (8.15, -21.5, 195), (8.275, -27, 360),
                    (8.439, -22, 434), (8.545, -26.5, 360)]

    def eddies(low_hz, top_hz):
        shared, left, right = cut(rng.standard_normal((3, N)), [low_hz, top_hz], "band", order=3)
        return rms_one(shared + np.array([left, right]))
    breeze = stroke(6.95, 8.52, -35.5, rise_s=0.088, fade_db_per_s=217)
    gusts = amp(4.5 * drift(11))
    out = breeze * gusts * eddies(low_hz=40.4, top_hz=130)
    for s, db, top_hz in buffet_table:
        passing = (1 + ((TIME - s) * top_hz / 6.4) ** 2) ** 2   # higher eddies are shorter
        out = out + amp(db - 0.5) * eddies(45, top_hz) / passing
    return out


def scene():
    """The chute with its sides balanced by frequency, quiet yard air and wind at the microphone."""
    # balance of the chute: frequency_hz, left_minus_right_db
    chute_balance = [(100, -2), (300, -1.3), (600, -2.5), (1100, -2.5), (2000, -2.5), (4000, 3),
                     (8000, 0.5), (15000, -0.5)]
    # dry pivot: time_s, pitch_hz, level_db
    pivot_track = [(.488, 2480, -52), (0.498, 2550, -35.5), (.52, 2645, -26.5), (0.543, 2484, -31.5),
                   (.562, 2170, -30), (.58, 1850, -31), (0.598, 1604, -31), (.608, 1460, -52)]
    # a faint falling whine as the closed gates settle: time_s, pitch_hz, level_db
    settle_track = [(5.885, 4540, -71), (5.91, 4340, -70), (6.02, 4020, -76)]
    # tone colour of the yard air: frequency_hz, level_db
    yard_colour = [(20, -38), (60, 6), (150, -0.5), (350, 0), (480, -13), (680, -9), (900, -16.5),
                   (2000, -16.5), (3000, -28), (4600, -28), (7000, -37.5), (10000, -35), (15000, -54)]
    machine = pump() + valves()
    gates = gate_travel() + ticks() + gate_blows() + squeal(pivot_track) + squeal(settle_track)
    shaken = loose_rings() + thumps()
    panels = side_panels() + rasps()
    chute = pan(machine + gates + shaken + panels, chute_balance)
    yard = amp(-53.5) * stereo_noise(yard_colour, OIL_WIDTH, 200, 15000)
    return chute + yard + wind()


def record(dry):
    """Two microphone ports hear the treble out of step; peaks are rounded and the top is cut."""
    # frequency_hz, left_lead_radians
    port_phase = [(6300, 0), (8300, -2.5), (10000, -7), (12200, -10), (14200, -7), (16000, -14.5)]
    lead = at_hz(port_phase, np.fft.rfftfreq(N, 1 / SR)) / 2
    heard = irfft(rfft(dry) * np.exp(1j * np.array([lead, -lead])), N)
    rounded = np.tanh(heard)
    cutoff_hz = 15900
    return signal.sosfilt(signal.ellip(12, .05, 70, cutoff_hz, fs=SR, output="sos"), rounded)


dry = scene()
out = record(dry)
wav_record(out)
```